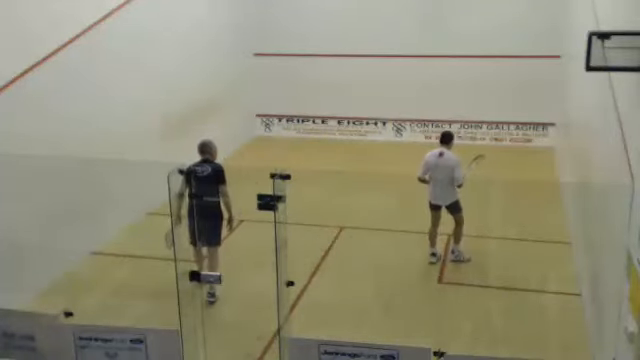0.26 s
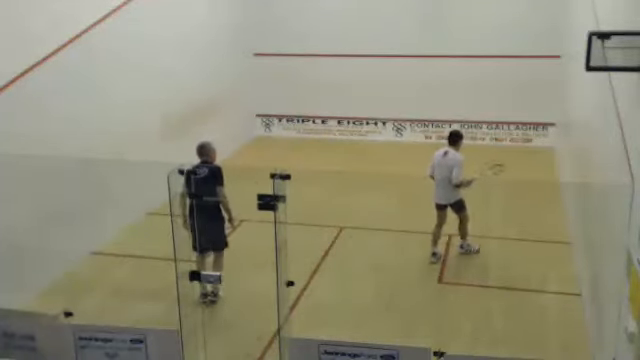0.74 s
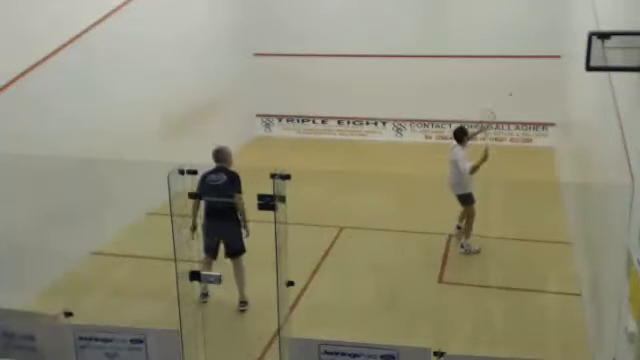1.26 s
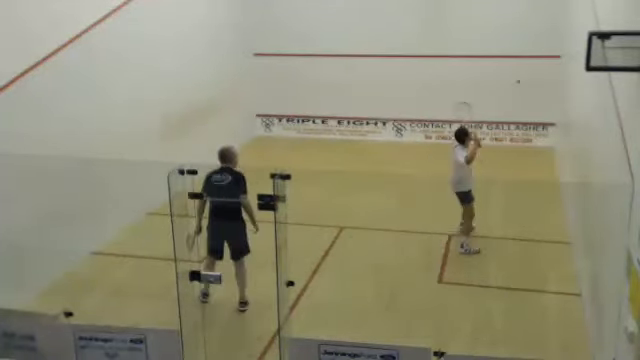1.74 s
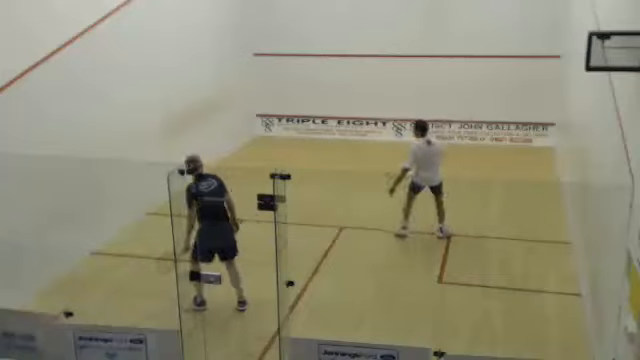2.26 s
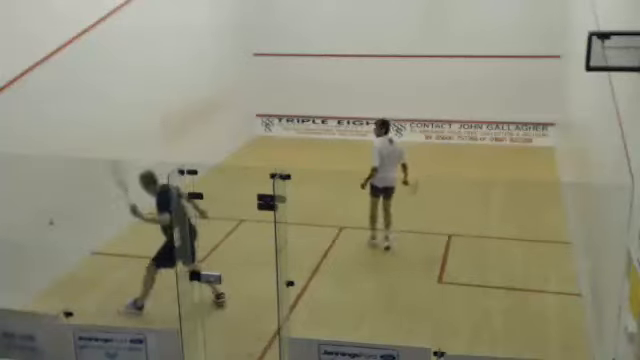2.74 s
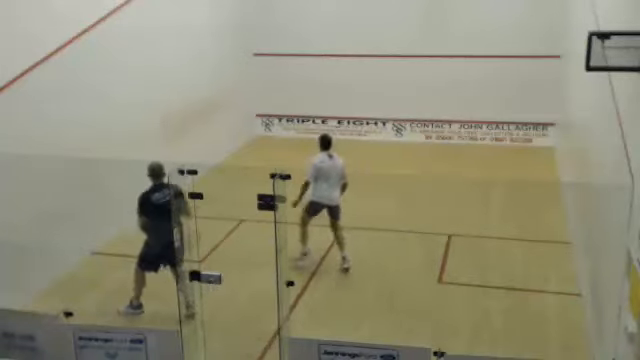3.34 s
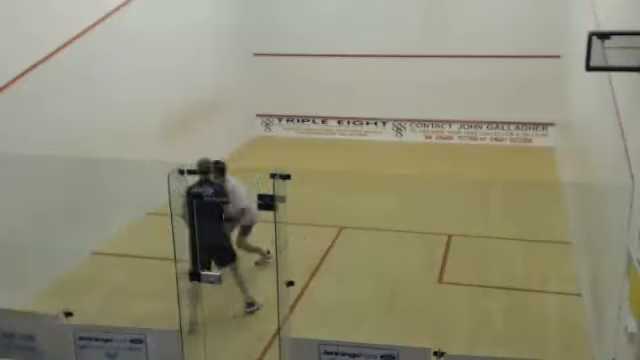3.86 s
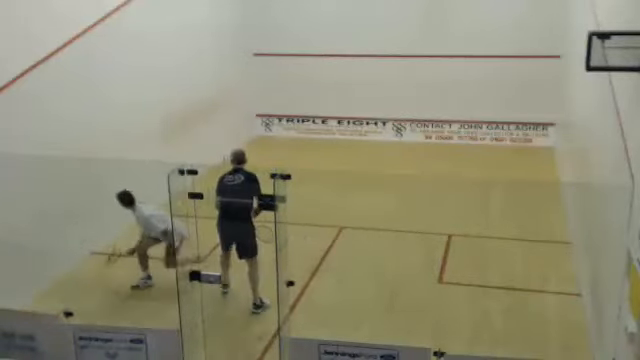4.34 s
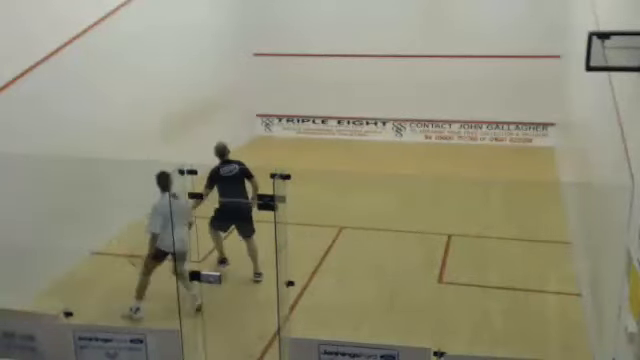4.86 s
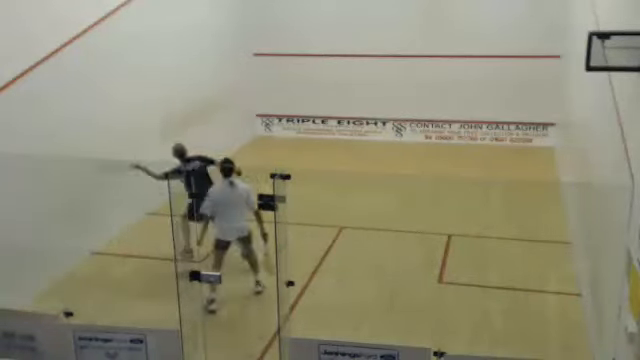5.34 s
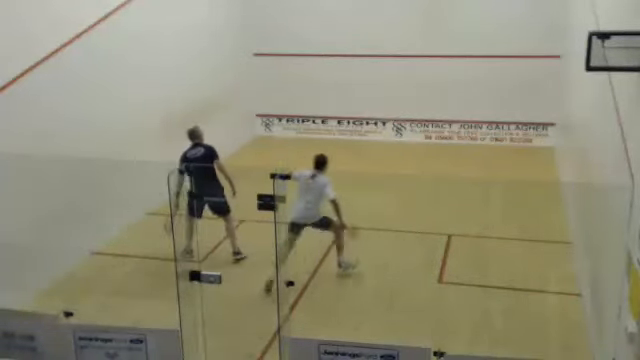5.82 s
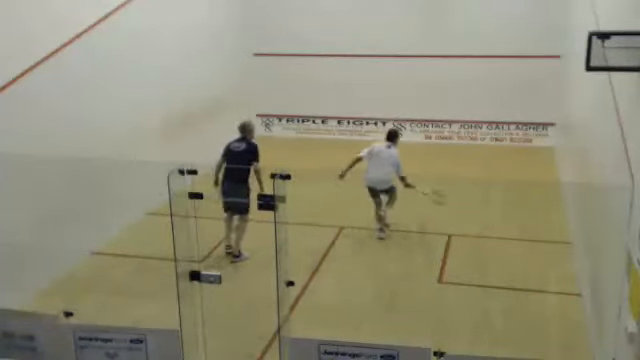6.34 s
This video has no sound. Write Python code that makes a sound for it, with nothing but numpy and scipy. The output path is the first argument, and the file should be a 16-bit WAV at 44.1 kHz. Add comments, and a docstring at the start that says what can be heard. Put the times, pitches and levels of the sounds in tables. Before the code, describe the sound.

Heard from above the back of an indoor squash court, a few soft taps lead into a loud cluster of racket and wall smacks. Shoes chirp briefly on the boards, then another strong hit rings out. The rally carries on with thinner clacks, scuffs and low running thuds. The hard walls add a short echo to each blow, and air handling rumbles faintly underneath.

```python
"""A rubber ball smacks rackets, walls and floor in a rally on a hard-walled indoor court, heard from
above the glass back wall. Each blow excites a few broad modes. Feet thump the sprung boards, soles
squeak (stick-slip) and scuff; the court rings on after them, over the noise of the air handling.
A noise suppressor shuts each band once its ring nears the hall noise; a limiter holds down loud blows."""
import sys
import numpy as np
from scipy import signal
from scipy.fft import rfft, irfft
from scipy.io import wavfile
from scipy.ndimage import uniform_filter1d

SR = 44100
rng = np.random.default_rng(int(sys.argv[2]) if len(sys.argv) > 2 else 0)


def dump(signal):
    """Clip the signal to [-1, 1] and save it as 16-bit WAV at the path in sys.argv[1]."""
    limited = np.clip(np.atleast_2d(signal).T, -1, 1)
    pcm = np.round(limited * 32767).astype(np.int16)
    wavfile.write(sys.argv[1], SR, pcm)


N = 290619
FINE_HZ = np.fft.rfftfreq(2048, 1 / SR)  # frequency grid of every colour curve


def ball_blows():
    """Each blow: a snap and a short rattle through the modes, then the court's ring in their colour."""
    # (time [s], level [dB], racket 0 to wall 1 [-], tilt [dB/octave], extra boom [dB],
    #  extra hollow [dB], extra knock [dB], first arrival over ring [dB], ring time [factor])
    blows = [(.063, -35.5, 0, -4, -4, 6.5, 6, 10, 0.041), (0.307, -35, 0.04, -4, -21, -6, 0, -10, 0.12),
             (.343, -34, 1, -3.5, -16, -6, 3.5, -13.5, 0.13),
             (.801, -15.5, 0.31, -0.5, -1.5, -4, -12, 8, 0.93),
             (0.826, -13, 0.54, -3.5, -18, -4, 7.5, 8.5, 0.27),
             (.927, -6, 0.59, -0.5, -9.5, -3, -7.5, 4.5, 0.93),
             (1.036, -16, 0.7, -2.5, -16, -6, -2, 2.5, 0.62), (1.136, -30.5, 1, -1.5, -16.5, 6, -3, 25, 1),
             (2.15, -26, 0.35, -0.5, 2, -3.5, 3, 3, 1), (2.338, -12.5, 0.96, 3.5, 10, 2, 0.5, 7.5, 0.8),
             (3.32, -28.5, 0.4, 3.5, 8.5, 1.5, 2.5, 8.5, 0.55),
             (3.599, -28.5, 0.69, 6, 11.5, -1, 9.5, 17, 0.72), (4.476, -40.5, 0, 7, 6.5, -5.5, -3.5, 7, 1),
             (4.528, -34.5, 0, -1.5, -14.5, -19, -1, 15.5, 0.61),
             (4.828, -25, 0.4, -1, -2, -17, -0.5, 13, 0.88),
             (4.889, -32.5, 0.1, -2.5, 2, -24, 1.5, 17, 0.95),
             (4.997, -29, 0.6, -2.5, 0.5, -5, 2.5, 9.5, 0.59),
             (5.682, -22, 0.25, -1.5, -8, -2.5, -3, 12.5, 0.76),
             (6.182, -40, 0.6, 1.5, -13.5, -10, -1.5, 7.5, 0.55)]
    # rows: crack, fizz, boom, hollow, frame, knock, shell, upper shell
    # (centre [Hz], width [Hz], off a racket [dB], off a wall [dB])
    blow_modes = [(3446, 4370, 2, -10), (5940, 4200, -13, -15), (386, 275, 4.5, -6), (750, 317, -1.5, 2),
                  (1023, 300, -10.5, -9.5), (1400, 600, 0, -11.5), (1982, 467, -11.5, -1),
                  (2500, 600, -7.5, -10)]
    hz, width_hz, racket_db, wall_db = np.transpose(blow_modes)
    hollow_row, knock_row = 3, 5
    pivot_hz, boom_below_hz = 1500, 500
    snap_db, snap_rise_s, rattle_db, rattle_t60_s = -6.5, 0.00045, -3, 0.037
    out, t = np.zeros(N), np.arange(2048) / SR
    for s, level_db, wall, tilt_db_oct, boom_db, hollow_db, knock_db, first_db, t60_factor in blows:
        mode_db = level_db + racket_db + wall * (wall_db - racket_db)
        mode_db[[hollow_row, knock_row]] += hollow_db, knock_db
        mode_db += tilt_db_oct * np.log2(hz / pivot_hz) + boom_db * (hz < boom_below_hz)
        modes = list(zip(mode_db, hz, width_hz))
        # the root keeps a mode's power independent of its width
        colour = sum(gain_of(db) * hump(FINE_HZ, f, w) * np.sqrt(SR / 2 / w) for db, f, w in modes)
        snap = sum(gain_of(db - 27 * w * t) * np.sin(2 * np.pi * f * t) for db, f, w in modes)
        snap *= gain_of(snap_db) * -np.expm1(-t / snap_rise_s)
        rattle = irfft(rfft(rng.standard_normal(len(t))) * colour * hump(FINE_HZ, 4340, 5980))
        rattle *= gain_of(rattle_db - 60 * t / rattle_t60_s)
        add(out, s, gain_of(first_db) * (snap + rattle))
        add(out, s, court_ring(colour, t60_factor))
    return out


def clacks(t60_cycles=39):
    """Short pips of tone and hiss, most likely thrown back by a flat wall."""
    # lone clacks, most inside the ring of a blow: (time [s], level [dB], pitch [Hz])
    pips = [(.066, -24, 900), (0.309, -21, 1170), (0.347, -27, 1850), (.355, -26.5, 905),
            (0.8888, -14.5, 1480), (1.0663, 4.5, 1970), (1.136, 0, 765), (1.215, -7, 736),
            (1.715, -15, 803), (1.746, -20.5, 820), (2.112, -25, 2500), (2.152, -12.5, 1446),
            (2.158, -8.5, 1320), (2.168, -8.5, 1510), (2.28, -14.5, 1300), (2.358, -4.5, 1980),
            (2.39, 0, 832), (2.4249, 0.5, 1866), (2.495, 1.5, 842), (2.565, -11, 748), (2.612, -12.5, 1970),
            (3.29, -21, 5000), (3.32, -15, 5910), (3.338, -10.5, 1840), (3.355, -14.5, 1980),
            (3.435, -19.5, 3300), (3.599, -10, 3050), (3.612, -18, 4000), (3.6239, -10, 1920),
            (3.656, -12, 1190), (3.668, -13.5, 2900), (3.685, -13.5, 1500), (3.689, -12, 1400),
            (3.7075, -6.5, 1680), (3.7067, -9, 3100), (3.733, -16, 2300), (4.474, -25.5, 5500),
            (4.478, -22, 3400), (4.51, -18.5, 4300), (4.529, -19.5, 3900), (4.536, -17, 1120),
            (4.828, -9.5, 1970), (4.836, -11, 1720), (4.843, -14.5, 1620), (4.845, -16, 2400),
            (4.847, -16.5, 977), (4.89, -12.5, 1120), (4.891, -13, 2900), (4.996, -12.5, 1524),
            (5.683, -6, 3100), (5.69, -9, 3000), (5.702, -20, 2210), (5.721, -19, 2300), (5.739, -19, 2900),
            (5.757, -15, 1860), (5.8, -16, 2290)]
    out, t = np.zeros(N), np.arange(2048) / SR
    for s, db, hz in pips:
        hiss = band(rng.standard_normal(len(t)), centre_hz=2500, width_hz=5000)
        pip = np.sin(2 * np.pi * hz * t) + hz / 1700 * hiss
        add(out, s, gain_of(db - 60 * t * hz / t60_cycles) * pip)
    return out


def board_thumps(pushes=4):
    """Boards swing under a soft push that rebounds ever weaker; each leaves a low ring in the court."""
    # feet and low knocks: (time [s], level [dB], pitch [Hz], loss per rebound [dB])
    thumps = [(0.078, -26.5, 282, 15.5), (0.122, -24, 337.5, 8.5), (0.145, -36, 332, 19),
              (0.286, -24, 199, 20), (.924, -13, 238, 7.5), (0.765, -24.5, 276, 3.5), (0.933, -1, 360, 23),
              (1.415, -25.5, 116, 24), (1.03, -13, 280, 10), (1.446, -21, 108.6, 22), (1.625, -20, 134, 11),
              (1.653, -22.5, 167, 24.5), (1.902, -25.5, 266, 1.5), (1.957, -32.5, 111.8, 20.5),
              (2.154, -24, 159.5, 15), (2.145, -23, 425, 16), (2.168, -23, 428, 3), (2.196, -16, 334, 8),
              (2.272, -19.5, 545, 8.5), (2.329, -18.5, 185, 1), (2.719, -18, 103.7, 12.5),
              (2.805, -30, 148.5, 21), (3.016, -19, 121, 9), (3.174, -13.5, 105, 5),
              (3.203, -16, 120.5, 13), (3.221, -17, 308.5, 6), (3.24, -9.5, 112, 5), (3.25, -15, 235.3, 9),
              (3.395, -18.5, 462, 11.5), (3.416, -17, 104.4, 9.5), (3.598, -15.5, 399.3, 14),
              (3.615, -14.5, 249, 22.5), (3.632, -18.5, 385, 14.5), (3.649, -14, 267.4, 19.5),
              (3.7, -22, 264, 14), (3.72, -23.5, 397, 3.5), (3.883, -17.5, 93.8, 18),
              (4.259, -26.5, 113, 8), (4.313, -32, 175, 16.5), (4.471, -25.5, 98.8, 15.5),
              (4.549, -24.5, 258, 12), (4.576, -28.5, 325, 14), (4.609, -27.5, 254, 13),
              (4.885, -19.5, 382.5, 7), (4.965, -15.5, 113.8, 1.5), (4.999, -18.5, 490, 14),
              (5.057, -10.5, 295.7, 5.5), (5.064, -15.5, 152.3, 1.5), (5.14, -30, 579, 4),
              (5.209, -20, 369.7, 6), (5.326, -21, 145.7, 6), (5.472, -27, 114.5, 17),
              (5.576, -29, 442, 0.5), (5.648, -11, 121.5, 4.5), (5.698, -11.5, 143.3, 1.5),
              (5.8, -18, 168.4, 3), (5.867, -14.5, 106.6, 5), (6.072, -17, 124, 12.5),
              (6.139, -20, 104, 11.5), (6.203, -25.5, 99, 16.5), (6.258, -21, 106, 17.5),
              (6.451, -26, 169, 18.5)]
    push_s, lead_s, rebound_s = 0.04, 0.009, 0.041
    time_scatter, pitch_scatter = 0.1249, 0.12
    out, t = np.zeros(N), np.arange(0, 3 * push_s, 1 / SR)
    rise = t / (0.4 * push_s)
    push = (rise * np.exp(1 - rise)) ** 2
    sag = 1 - 0.028 * t / push_s
    chance = rng.standard_normal((len(thumps), pushes, 2))
    chance[:, 0] = 0  # only rebounds scatter
    for (s, db, hz, loss_db), draws in zip(thumps, chance):
        tail = court_ring(hump(FINE_HZ, hz, 2.12 * hz), t60_factor=0.26, samples=SR // 2)
        tail *= gain_of(-10.5) * np.sqrt(SR / hz)
        for k, (late, sharp) in enumerate(draws):
            at_s = s + rebound_s * (k + time_scatter * late)
            gain = gain_of(db - k * loss_db)
            pitch_hz = hz * (1 + pitch_scatter * sharp) * sag
            add(out, at_s - lead_s, gain * push * np.sin(2 * np.pi * pitch_hz * t))
            add(out, at_s, gain * tail)
    return out


def squeaks(waver=0.033, grip_db=3, scrape_db=-23.5):
    """Rubber soles grip unevenly: a wavering stick-slip tone with its octave and a scrape of hiss."""
    # (time [s], level [dB], pitch [Hz], length [s], octave over fundamental [dB])
    slips = [(1.523, -27, 3410, 0.065, -8.5), (1.561, -11.5, 3324, 0.017, -12.5),
             (1.572, -16, 3000, 0.03, -8.5), (1.575, -31.5, 3495, .07, -3),
             (1.635, -17.5, 2780, 0.016, -15), (1.675, -30, 3445, 0.06, -5.5),
             (1.683, -28.5, 2970, 0.043, -4.5), (1.742, -19, 3364, 0.011, -16),
             (4.316, -33.5, 2557, 0.13, -40.5), (4.525, -36.5, 2500, 0.043, -49)]
    out = np.zeros(N)
    for s, db, hz, length_s, octave_db in slips:
        n = round(length_s * SR)
        phase = 2 * np.pi * np.cumsum(hz * (1 + waver * wander(n, 80))) / SR
        grip = gain_of(grip_db * wander(n, 50))
        tone = grip * (np.sin(phase) + gain_of(octave_db) * np.sin(2 * phase))
        scrape = unit_rms(band(rng.standard_normal(n), centre_hz=1.6 * hz, width_hz=1.6 * hz))
        add(out, s, gain_of(db) * (tone + gain_of(scrape_db) * scrape) * signal.windows.tukey(n, 0.35))
    return out


def scuffs(grit_db=3.5):
    """Sliding soles and racket swishes: uneven hiss that swells up to the stop."""
    # (time [s], level [dB], centre [Hz], width [Hz], length [s])
    slides = [(0.655, -33, 913, 243, 0.057), (0.752, -28.5, 6380, 5050, 0.085),
              (2.097, -25, 3700, 7000, 0.051), (3.176, -29, 3200, 6460, .045),
              (3.238, -27.5, 3230, 6000, 0.028), (3.264, -19.5, 3280, 6640, 0.05),
              (3.365, -30, 4040, 6060, 0.1), (4.299, -46.5, 7200, 1830, .035),
              (4.41, -37.5, 3850, 900, .06), (4.45, -27, 5180, 5100, 0.045),
              (5.659, -16, 2056, 3960, 0.076)]
    out = np.zeros(N)
    for s, db, hz, width_hz, length_s in slides:
        n = round(length_s * SR)
        hiss = unit_rms(band(rng.standard_normal(n), hz, width_hz))
        drag = gain_of(grit_db * wander(n, 150))
        swell = np.linspace(0, 1, n) * signal.windows.tukey(n, 0.3)
        add(out, s, gain_of(db) * hiss * drag * swell)
    return out


def with_court(direct, ring_db=-3):
    """Direct sound plus the court's reflections of it."""
    tail = court_ring(np.ones(len(FINE_HZ)), t60_factor=0.67)
    return direct + gain_of(ring_db) * signal.fftconvolve(direct, tail / np.linalg.norm(tail))[:N]


def court_ring(colour, t60_factor, samples=SR):
    """Dense reflections of uneven size; each band builds up and dies at its own rate."""
    # court decay: (frequency [Hz], T60 before t60_factor [s])
    decay = [(100, 0.25), (300, 2.5), (800, 2.136), (1400, 2.1), (2000, 2.16), (2700, 1.69), (4000, 1.625),
             (7000, 1.284)]
    # ring build-up: (frequency [Hz], time constant [s])
    build_up = [(200, 0.00073), (800, 0.0042), (3000, 0.003)]
    slot_samples, uneven_db, clump_db, blend_s = 20, 2.5, 3.6, 0.17
    slots = np.arange(0, samples - slot_samples, slot_samples)
    n = len(slots)
    height = rng.choice([-1., 1.], n) * gain_of(uneven_db * rng.standard_normal(n))
    height *= gain_of(clump_db * wander(n, 16) * np.exp(-slots / SR / blend_s))  # early arrivals bunch
    taps = np.zeros(samples)
    taps[slots + rng.integers(0, slot_samples, n)] = height
    hz, t, spectra = signal.stft(unit_rms(taps), SR, nperseg=256)
    spectra *= gain_of(-60 * t / (t60_factor * read(decay, hz)[:, None]))
    spectra *= -np.expm1(-t / read(build_up, hz)[:, None])
    return signal.oaconvolve(signal.istft(spectra, SR, nperseg=256)[1], minimum_phase(colour))


def hall_noise(level_db=-34):
    """Air handling and distant rumble: random spectra with drifting patches."""
    # (frequency [Hz], relative density [dB])
    spectrum = [(29, -83.5), (50, -55), (97, -8.5), (164, -16.5), (199, 8), (273, -41), (324, -11),
                (1130, -19.5), (1590, -22.5), (2950, -29), (3300, -32.5), (6200, -39), (6500, -48.5),
                (8000, -50.5), (10400, -78.5), (17600, -120)]
    # (frequency [Hz], rms patch depth [dB])
    patch_depth = [(300, 2.6), (1500, 1.5)]
    frames, hz = N // 256 + 5, np.fft.rfftfreq(1024, 1 / SR)
    real, imag, patches = rng.standard_normal((frames, len(hz), 3)).T
    patches = unit_rms(uniform_filter1d(uniform_filter1d(patches, 8, axis=0), 14, axis=1))
    shape_db = read(spectrum, hz)[:, None] + read(patch_depth, hz)[:, None] * patches
    noise = signal.istft((real + 1j * imag) * gain_of(shape_db), nperseg=1024, noverlap=768)[1]
    return gain_of(level_db) * unit_rms(noise[:N])


def gain_of(db):
    """Decibels to amplitude gain."""
    return 10 ** (np.asarray(db) / 20)


def unit_rms(x):
    """Scales to rms 1."""
    return x / np.sqrt(np.mean(x ** 2) + 1e-20)


def wander(n, span):
    """n random values smoothed over span points, rms 1."""
    return unit_rms(uniform_filter1d(rng.standard_normal(n), size=span))


def read(points, hz):
    """Interpolates a table on a log-frequency axis."""
    point_hz, value = np.transpose(points)
    return np.interp(np.log(hz + 1), np.log(point_hz + 1), value)


def add(mix, s, sound):
    """Mixes a sound in at s seconds."""
    part = mix[round(s * SR):][:len(sound)]
    part += sound[:len(part)]


def hump(hz, centre_hz, width_hz):
    """Steep resonance curve of height 1."""
    return 1 / (1 + (2 * (hz - centre_hz) / width_hz) ** 4)


def band(x, centre_hz, width_hz):
    """Filters through one broad resonance."""
    return irfft(rfft(x) * hump(np.fft.rfftfreq(len(x), 1 / SR), centre_hz, width_hz), len(x))


def minimum_phase(colour):
    """Filter taps with the given gain at FINE_HZ and no pre-ring."""
    cepstrum = irfft(np.log(colour + 1e-5))
    cepstrum[1:len(colour) - 1] *= 2
    cepstrum[len(colour):] = 0
    return irfft(np.exp(rfft(cepstrum)))


def scene():
    """All sources at the microphone, mono."""
    return (ball_blows() + clacks() + board_thumps() + with_court(squeaks() + scuffs()) + hall_noise())[None]


def suppress(x, recent_db=-14):
    """Removes each band's noise share, judged from its quietest moments; opens at once, shuts late."""
    # (frequency [Hz], threshold over the quietest moments [dB])
    margin = [(100, 8), (300, 8), (800, 9), (2000, 9), (4000, 9), (7000, 9)]
    # (frequency [Hz], gain when shut [dB])
    shut = [(100, -8), (400, -11), (1000, -12), (3000, -13), (7000, -13)]
    hz, _, spectra = signal.stft(x, SR, nperseg=512, noverlap=384)
    edges_hz = np.append(np.geomspace(170, 8000, 16), SR)
    in_band = (np.searchsorted(edges_hz, hz) == np.arange(len(edges_hz))[:, None]) * 1.
    power = uniform_filter1d(in_band @ abs(spectra) ** 2, size=7, axis=1) + 1e-20
    lagged = signal.lfilter([0.16], [1, 0.16 - 1], power, axis=1)
    recent = signal.lfilter([0.004], [1, 0.004 - 1], power, axis=1)
    floor = np.percentile(lagged, 10, axis=1) * gain_of(2 * read(margin, edges_hz))
    noise = floor[:, None] + gain_of(2 * recent_db) * recent  # long loud sound lifts the estimate
    gain = np.maximum(1 - noise / np.maximum(power, lagged), gain_of(read(shut, edges_hz))[:, None])
    return signal.istft(spectra * (in_band.T @ gain), SR, nperseg=512, noverlap=384)[1][:N]


def record(dry):
    """Microphone colour, suppressor, gain control, soft limiter, output colour, hard clip, low-pass."""
    # microphone response: (frequency [Hz], gain [dB])
    mic = [(30, -27.5), (70, -7), (120, -2.5), (5000, -8.5), (6900, -11.5)]
    # output stage, trims the lowest bass and drops the top in steps: (frequency [Hz], gain [dB])
    output_stage = [(35, -9), (70, 0), (7050, 0), (7350, -8), (8100, -5), (8250, -22), (9400, -14),
                    (9600, -38), (11000, -42)]
    threshold_db, cut_db_per_db, hold_fall_db_s = -6.5, 0.36, 31
    soft_ceiling, hard_ceiling, edge_hz = 0.715, 0.716, 16000
    hz = np.fft.rfftfreq(N, 1 / SR)
    x = suppress(irfft(rfft(dry[0]) * gain_of(read(mic, hz)), N))
    power_db = 10 * np.log10(abs(uniform_filter1d(x ** 2, size=400)) + 1e-12)
    fall_db = np.arange(N) * hold_fall_db_s / SR
    held_db = np.maximum.accumulate(power_db + fall_db) - fall_db
    over_db = np.maximum(held_db - threshold_db, 0)
    x = x / gain_of(cut_db_per_db * uniform_filter1d(over_db, size=200))
    x = x / (1 + abs(x / soft_ceiling) ** 4) ** 0.25
    x = irfft(rfft(x) * gain_of(read(output_stage, hz)), N)
    x = np.clip(x, -hard_ceiling, hard_ceiling)
    low_pass = signal.firwin(511, edge_hz, window=("kaiser", 9), fs=SR)
    return signal.oaconvolve(x, low_pass, "same")[None]


dry = scene()
out = record(dry)
dump(out)
```